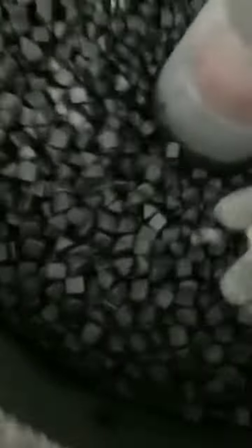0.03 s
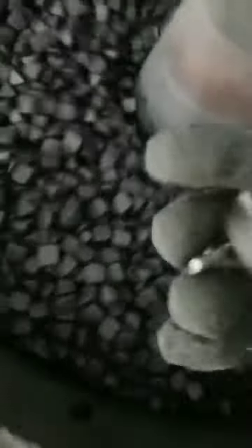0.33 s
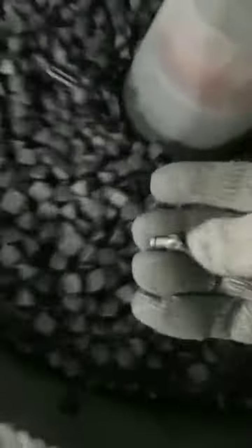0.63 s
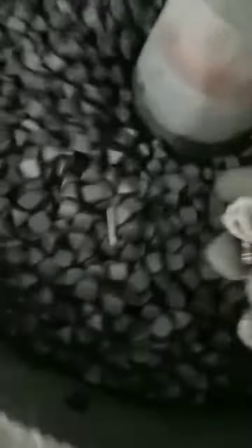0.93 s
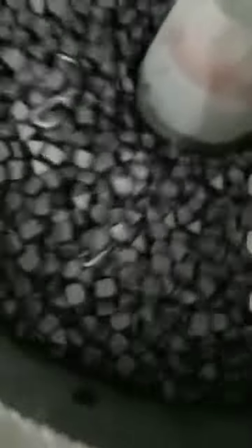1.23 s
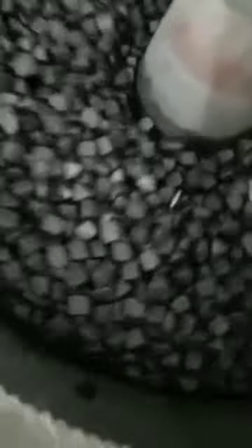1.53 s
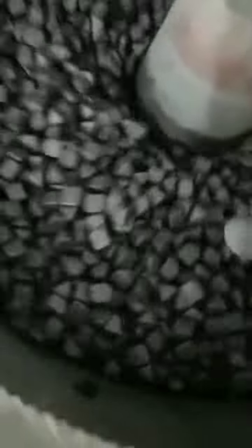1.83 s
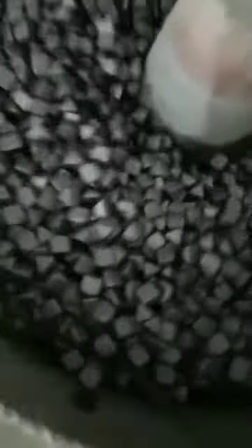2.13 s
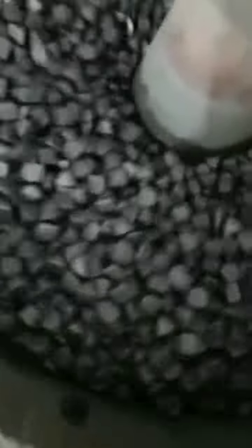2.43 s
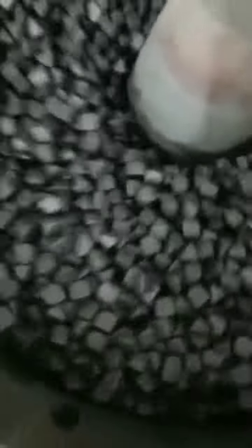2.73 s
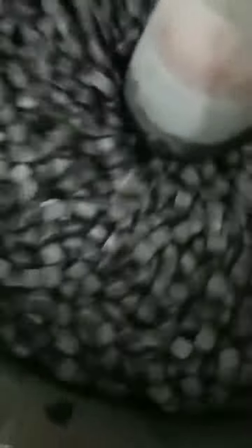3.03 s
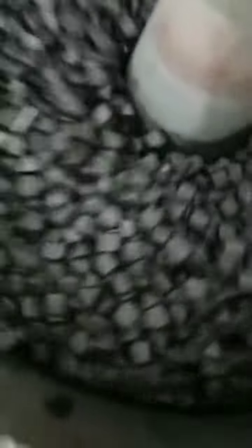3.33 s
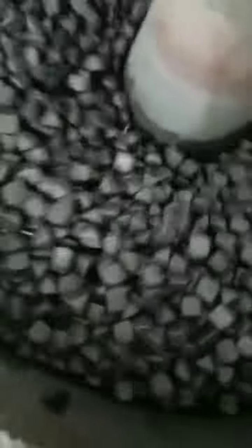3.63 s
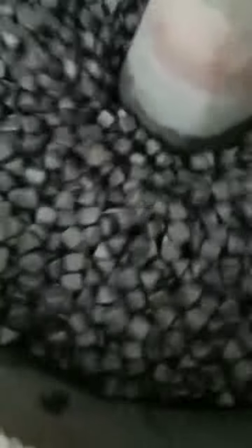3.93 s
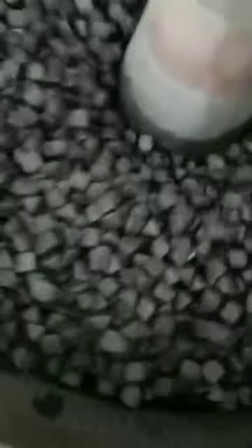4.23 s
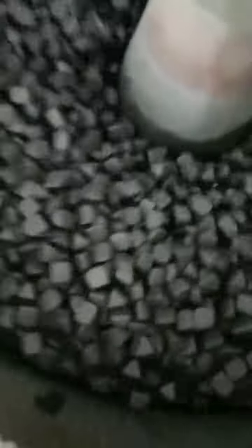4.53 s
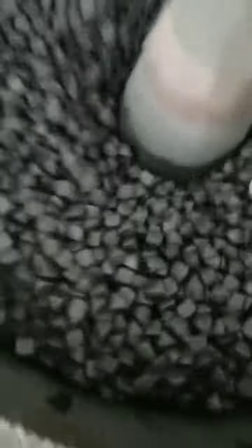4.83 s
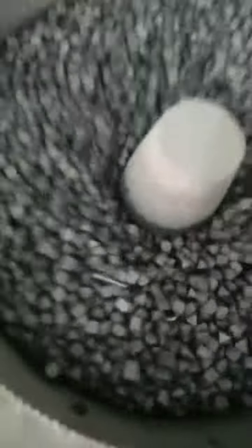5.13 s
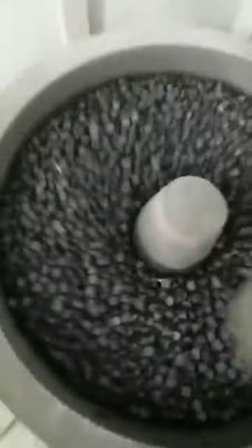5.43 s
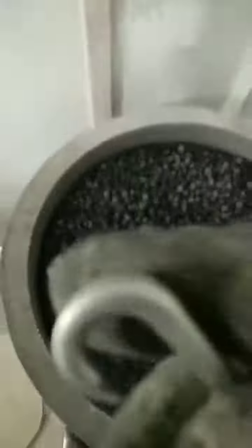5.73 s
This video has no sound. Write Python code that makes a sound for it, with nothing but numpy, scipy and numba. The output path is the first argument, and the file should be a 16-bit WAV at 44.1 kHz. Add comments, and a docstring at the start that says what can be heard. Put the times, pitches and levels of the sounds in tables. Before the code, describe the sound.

Thousands of polishing chips clatter and sizzle in a humming, shaking tumbler bowl, the rattle growing softer and duller near the end.

```python
"""Polishing chips rattle in a vibratory tumbler, shaken 24.5 times a second by an off-centre weight.
The heap is tossed and lands once a turn: chips click, clack and scrape, small metal parts clink,
and the bowl booms. The weight makes the housing hum over a low rumble from the mounts.
The microphone hangs over the bowl and draws back near the end, into the workshop's even roar."""
import sys
import numpy as np
from scipy import signal
from scipy.fft import rfft, irfft, next_fast_len
from scipy.io import wavfile
from scipy.ndimage import map_coordinates
from numba import njit

SR = 44100
rng = np.random.default_rng(int(sys.argv[2]) if len(sys.argv) > 2 else 0)


def bounce(signal):
    """Save signal as a 16-bit WAV file at the path given by the first command-line argument."""
    frames = np.transpose(np.atleast_2d(signal))
    limited = np.clip(frames, -1, 1)
    pcm = np.round(limited * 32767).astype(np.int16)
    wavfile.write(sys.argv[1], SR, pcm)


N = 264600

SHAFT_HZ, TOP_HZ = 24.523, 15150
# Resonances of the loaded bowl: f/Hz, width/Hz, gain/dB
BOWL_MODES = [(210.5, 50, 0), (254, 60, -6.5), (395, 38, -14)]
# Left-right likeness of rattle and roar: f/Hz, correlation
CORRELATION = [(250, 0.98), (600, 0.054), (1200, 0.17), (2500, 0.79), (5000, 0.16), (12000, -0.049)]


def chip_rattle(turns, back, level_db):
    """Thousands of chips click together, hardest as the heap lands; every second toss is higher."""
    # Chip-on-chip spectrum: f/Hz, level/dB
    spectrum = [(250, -30), (600, -3), (720, -14.5), (810, -10), (930, -21.5), (1380, -9.5), (1800, -8),
                (2300, -2.5), (2900, -5.5), (3600, -4.5), (4200, -7), (4900, -13), (6900, -10), (8300, -19),
                (10200, -18.5), (12500, -21), (15000, -47)]
    # Resonances colouring the rattle: f/Hz, width/Hz, lift/dB
    hollow = [(1040, 65, 6), (1390, 80, 2.5), (1505, 60, 4.5), (1850, 230, 5), (2160, 110, 3)]
    landing_turn = 0.65
    beam_hz, beam_width_hz = 4240, 470  # resonance beamed upward by the bowl
    height_db = 0.28 * np.cos(np.pi * (turns - landing_turn)) + 0.3 * wobble(35)
    toss = once_a_turn(turns, at=landing_turn, sharp=0.175) * amp(height_db)
    surface = surface_chips(toss, count=16000, base_t60_s=0.052, scatter_db=1.9, linger_s=0.065)
    buried = spread(contacts(rate_hz=18000, scatter_db=3) * toss, CORRELATION)  # dry crunch
    lift_db = lambda hz: sum(db / (1 + (2 * (hz - c) / w) ** 2) for c, w, db in hollow)
    rattle = unit(filtered(buried + amp(1.2) * surface, lambda hz: amp(along(spectrum, hz) + lift_db(hz))))
    treble = filtered(rattle, lambda hz: hz ** 2 / (hz ** 2 + 5000 ** 2))
    shaded = rattle - 0.26 * back * treble  # the rim screens the treble
    beam = filtered(rattle, lambda hz: 1 / (1 + 2j * (hz - beam_hz) / beam_width_hz))
    return amp(level_db) * (shaded + (0.42 - 0.38 * back) * beam)


def surface_chips(toss, count, base_t60_s, scatter_db, linger_s):
    """Each loose chip has its own pitch and place, and strikes four times before it sinks."""
    birth, pitch, place, damping = rng.random((4, count, 1))
    size = amp(scatter_db * np.clip(rng.standard_normal((count, 1)), -2, 2))
    size = size * rng.uniform(0.3, 1, (count, 4))
    start_s = (birth * N / SR + linger_s * rng.random((count, 4))) % (N / SR)
    hz = 900 + 10000 * pitch ** 1.3
    # small, high chips are fainter and die sooner
    size = size * toss[(start_s * SR).astype(int)] * (1 - pitch / 3)
    t60_s = base_t60_s * (0.5 + damping) / (1 + (hz / 11000) ** 2)
    columns = np.broadcast_arrays(start_s, hz, size, t60_s, 2 * place - 1)
    return unit(strikes(*[c.ravel() for c in columns]))


def chip_clacks():
    """A chip drops hard on the heap and rebounds once."""
    # Hard drops: t/s, relative level/dB, f/Hz
    drops = [(0.03, -7, 2264), (0.076, -4, 2310), (0.315, -8, 4260), (0.488, -19, 1400), (0.606, -8, 2230),
             (0.614, -8, 1950), (.817, -15, 4155), (0.8484, -7, 2300), (0.889, -7, 1798), (0.887, -8, 1980),
             (0.939, -8, 2310), (0.962, -7.5, 1754), (1.055, -13, 2756), (1.499, -13, 3682),
             (1.588, -3, 2420), (2.111, -8, 2700), (2.158, -5, 1980), (2.435, -8, 3875), (2.646, -5, 1950),
             (2.687, -12, 4200), (2.736, -5, 3434), (2.764, -3, 2670), (2.847, -4, 2350), (2.862, -6, 2610),
             (2.978, -2, 2310), (3.216, -8, 2320), (3.271, -4, 2370), (3.293, -3.5, 2330),
             (3.67, -6.5, 2530), (3.708, -7, 2605), (3.789, -8, 2680), (3.839, -6, 2530),
             (3.854, -4.5, 2110), (3.946, -9, 4190), (3.994, -7, 2390), (4.022, -8, 1730),
             (4.347, -7, 2160), (4.35, -8, 4230), (4.4817, -8, 2540), (4.5637, -6, 1948), (4.64, -11, 2150),
             (4.814, -5, 3509), (4.82, -11, 2230), (4.98, -7, 2300)]
    start_s, db, hz = np.transpose(drops)
    size, t60_s = amp(db - 9.8), 0.068
    place, flight, tilt = rng.uniform(-0.733, 1, (len(start_s), 3)).T
    first = strikes(start_s, hz, size, t60_s, bearing=0.69 * place)
    rebound_s = start_s + 0.011 * (1 + flight / 2)
    rebound = strikes(rebound_s, hz * (1 + 0.016 * tilt), size * amp(-8.5), t60_s, bearing=0.24 * place)
    return first + rebound


def chip_scrapes(turns, level_db):
    """After each landing the chips slide over one another with a fine sizzle."""
    # Scrape spectrum: f/Hz, level/dB
    spectrum = [(3500, -30), (5000, -3), (6000, 2), (7100, 1.5), (8200, -19), (9600, -13), (12000, -25),
                (15000, -36)]
    scrapes = contacts(rate_hz=4500, scatter_db=3) * once_a_turn(turns, at=0.89, sharp=0.4)
    sizzle = filtered(spread(scrapes, CORRELATION), lambda hz: amp(along(spectrum, hz)))
    return amp(level_db) * unit(sizzle)


def metal_parts():
    """A part rings on one high mode while chips strike it; the briefer the contact, the harder its tick."""
    # Clinks: t/s, contact/s, f/Hz, relative level/dB
    clinks = [(0.417, 0.059, 10303, -32.5), (.435, .035, 9743, -40), (0.809, .045, 10280, -41),
              (0.86, .048, 10290, -37), (1.6, .012, 11225, -42), (2.652, .006, 14850, -33),
              (3.003, 0.022, 7421, -31), (3.04, .022, 7360, -36), (3.19, .032, 12100, -38.5),
              (3.34, .05, 10350, -43), (3.81, 0.026, 10282, -35), (4.195, .02, 7335, -35),
              (4.955, 0.025, 7440, -34), (4.96, 0.025, 9474, -43)]
    attack_s, t60_cycles = 0.003, 270
    t = np.arange(N) / SR
    out = np.zeros((2, N))
    crack = unit(filtered(rng.standard_normal((2, N)), lambda hz: (hz > 5000) * (hz < TOP_HZ)))
    for start_s, contact_s, hz, db in clinks:
        decay_db = -60 * np.clip(t - start_s - contact_s, 0, 1) * hz / t60_cycles
        envelope = np.clip((t - start_s) / attack_s, 0, 1) * amp(decay_db)
        jolts = amp(2.5 * wobble(150)) * np.exp(0.6j * wobble(250))  # strikes upset level and phase
        tone = (jolts * np.exp(2j * np.pi * (hz * t + 0.3 * rng.random((2, 1))))).imag
        tick = amp(4) * np.exp(-contact_s / 0.011) * crack
        out += amp(db - 1.5) * envelope * (tone + tick)
    return out


def bowl(turns, back, swell_db):
    """The landing heap thumps the bowl, drums on its wall and keeps its rim ringing."""
    # Wall resonances: f/Hz, width/Hz, gain/dB
    wall_modes = [(345, 45, -11), (401.6, 50, 11)]
    # Rim resonances: f/Hz, width/Hz, gain/dB
    rim_modes = [(495.7, 21, 19), (604, 160, -29)]
    # Drumming on the wall: t/s, relative level/dB
    wall_levels = [(0.05, -34), (0.47, -27.5), (0.65, -34), (1.65, -41), (2.2, -32), (2.55, -39),
                   (2.85, -30), (3.1, -23), (3.35, -37.5), (3.6, -27), (4.0, -34), (4.45, -30), (5.0, -39),
                   (5.3, -53), (5.95, -37)]
    thumps = contacts(rate_hz=2200, scatter_db=4.5) * once_a_turn(turns, at=0.81, sharp=0.12)
    drumming = contacts(rate_hz=3400, scatter_db=2) * once_a_turn(turns, at=0.55, sharp=0.11)
    boom_band = lambda hz: 1 / (1 + (150 / (hz + 1)) ** 6) / (1 + (hz / 480) ** 6)
    boom = unit(filtered(ring(thumps, BOWL_MODES), boom_band))
    wall = unit(filtered(ring(drumming, wall_modes), lambda hz: 1 / (1 + (hz / 520) ** 6)))
    rim = ring(drumming, rim_modes)
    return (amp(-30 - 9.5 * back + swell_db) * spread(boom, [(180, 1), (280, 0.66), (450, 0.67)])
            + amp(curve(wall_levels) - 4.5) * spread(wall, [(400, 0.49)])
            + amp(-34.5 - 16 * back) * spread(rim, [(500, 0.77)]))


def boom_swells():
    """Short rounded throbs of the bowl's boom, in dB."""
    # Crests: t/s, 1/e half-width/s, lift/dB
    crests = [(0.3, 0.034, 4.5), (0.581, 0.044, 4), (0.7, 0.023, 8.5), (0.87, 0.039, 5.5),
              (1.72, 0.026, 10.5), (2.04, 0.076, 9), (2.2, 0.063, 13), (2.53, 0.037, 7), (3.0, 0.028, 5),
              (3.548, 0.035, 9), (3.929, 0.021, 9), (4.08, 0.025, 7.5), (4.25, 0.041, 11),
              (5.7, 0.057, 5.5)]
    t = np.arange(N) / SR
    return sum(db * np.exp(-((t - crest_s) / width_s) ** 2) for crest_s, width_s, db in crests)


def housing(turns, back, swell_db):
    """The weight sways the bowl; its knock makes the housing hum on whole and half shaft multiples."""
    # Hum: shaft multiple, near level/dB, far level/dB
    hum = [(1.5, -44, -58), (2, -43, -59), (2.5, -53, -68), (3, -56, -46), (6, -51, -56), (7, -42, -47),
           (7.5, -46, -52), (8, -30.5, -37), (8.5, -33.5, -39), (9, -36, -40), (9.5, -39.5, -43),
           (11, -37.5, -39.5), (11.5, -39, -43), (12, -39, -39), (13, -48, -52), (14, -39.5, -46),
           (15, -43, -58), (16, -36.5, -46), (17, -52, -48), (24, -55, -63)]
    # Tones out of step with the shaft: f/Hz, near level/dB, far level/dB
    drones = [(53.2, -45, -56), (91.8, -39.5, -40), (157.6, -31, -36)]
    knock_turn = 0.74
    bowl_hz, bowl_width_hz, _ = BOWL_MODES[0]
    sway_db = -23.5 - 25.5 * back + 0.41 * wobble(12)
    out = amp(sway_db) * np.cos(2 * np.pi * turns) * np.ones((2, 1))
    # the heap keeps losing its every-second-turn step, so the half multiples slip together
    slip = 1.4 * wobble(1.2)
    tones = [(k * SHAFT_HZ, near_db, far_db, slip * (k % 1 > 0)) for k, near_db, far_db in hum]
    tones += [(*row, 0) for row in drones]
    for hz, near_db, far_db, drift in tones:
        lag = np.arctan(2 * (hz - bowl_hz) / bowl_width_hz)
        phase = 2 * np.pi * hz * (turns - knock_turn) / SHAFT_HZ - lag + drift
        phase += 0.8 * rng.standard_normal() + 0.26 * wobble(9)  # wavers with the shifting load
        stereo_skew = np.clip(0.15 * (hz / 280) ** 2, 0, 0.7) * np.array([[1], [-1]])
        throb_db = 0.72 * swell_db / (1 + ((hz - bowl_hz) / 14) ** 2)  # near the bowl's resonance
        level_db = near_db + back * (far_db - near_db) + throb_db - 1.45 + 1.46 * wobble(9)
        out += amp(level_db) * np.cos(phase + stereo_skew)
    return np.sqrt(2) * out


def low_rumble(back):
    """Dull rumble of the shaking base; a soft low thud, perhaps microphone handling, near 1.4 s."""
    # Rumble spectrum: f/Hz, level/dB
    spectrum = [(10, -20), (35, -7), (70, 1), (120, -3.5), (200, -3), (400, -9), (900, -36), (4000, -50)]
    thud_db = 4.5 * np.exp(-((np.arange(N) / SR - 1.41) / 0.078) ** 2)
    rumble = filtered(rng.standard_normal((2, N)), lambda hz: amp(along(spectrum, hz)))
    level_db = -33.5 - 7.4 * back + thud_db + 2.2 * wobble(7.1)
    return amp(level_db) * spread(rumble, [(130, 0.87), (500, 1)])


def room_roar(back):
    """The machine's even roar, returned by the room, grows away from the bowl."""
    # Roar spectrum: f/Hz, level/dB
    spectrum = [(200, -10), (420, -26), (560, -11), (690, 6), (820, 0), (960, -19), (1300, 4.5),
                (1700, -16), (2000, -4.5), (2600, 4.5), (3300, 2), (4200, -6), (9000, -38)]
    roar = filtered(rng.standard_normal((2, N)), lambda hz: amp(along(spectrum, hz)))
    return amp(-42.5 + 11.8 * back) * spread(roar, CORRELATION)


def workshop_reverb(x):
    """Diffuse tail; the treble dies first."""
    # Room decay: f/Hz, t60/s
    decay = [(200, 0.86), (2000, 0.22), (12000, 0.16)]
    hz, t, noise = signal.stft(rng.standard_normal((2, SR // 2)), SR, nperseg=256)
    tail = signal.istft(noise * amp(-60 * t / along(decay, hz)[:, None]), SR, nperseg=256)[1]
    return signal.fftconvolve(x, tail / np.linalg.norm(tail[0]), axes=1)[:, :N]


def strikes(start_s, hz, size, t60_s, bearing):
    """Short rings, each earlier and a little louder in the nearer channel."""
    pole = np.exp((2j * np.pi * hz - np.log(1000) / t60_s) / SR)
    pan = np.exp(np.outer(bearing * (0.2 + 1j * np.pi * hz * 0.0004), [1, -1]))
    return damped_rings((start_s * SR).astype(np.int64), pole, size[:, None] * pan, N)


@njit
def damped_rings(start, pole, gain, length):
    """Sum of decaying sines, each with a complex pole and left and right gains."""
    out = np.zeros((2, length))
    for i in range(len(start)):
        z = 1 + 0j
        end = min(length, start[i] + int(-5 / np.log(abs(pole[i]))))
        for n in range(start[i], end):
            out[0, n] += (gain[i, 0] * z).imag
            out[1, n] += (gain[i, 1] * z).imag
            z *= pole[i]
    return out


def contacts(rate_hz, scatter_db):
    """Random impacts of uneven size in two channels."""
    hit = rng.random((2, N)) < rate_hz / SR
    size = amp(scatter_db * np.clip(rng.standard_normal((2, N)), -2, 2))
    return unit(hit * size * rng.choice([-1, 1], (2, N)))


def once_a_turn(turns, at, sharp):
    """Swell peaking at one fraction of each turn."""
    return unit(np.exp(sharp * np.cos(2 * np.pi * (turns - at))))


def ring(x, modes):
    """x through resonances (f/Hz, width/Hz, gain/dB), at rms 1."""
    response = lambda f: sum(amp(db) * 1j * f * w / (c * c - f * f + 1j * f * w) for c, w, db in modes)
    return unit(filtered(x, response))


def spread(pair, correlation):
    """Two unrelated signals to stereo, given (f/Hz, correlation) points."""
    angle = lambda hz: np.arccos(np.clip(along(correlation, hz), -1, 1)) / 2
    mid, side = filtered(pair, lambda hz: np.array([np.cos(angle(hz)), np.sin(angle(hz))]))
    return unit(np.array([mid + side, mid - side]))


def filtered(x, response):
    """x through a complex frequency response."""
    size = next_fast_len(N + SR // 2)
    return irfft(rfft(x, size) * response(np.fft.rfftfreq(size, 1 / SR)), size)[..., :N]


def wobble(rate_hz):
    """Smooth random curve with knots at rate_hz."""
    knots = rng.standard_normal(int(N * rate_hz / SR) + 4)
    return map_coordinates(knots, [np.arange(N) * rate_hz / SR])


def along(points, hz):
    """Read (f/Hz, value) points on a log axis."""
    f, values = np.transpose(points)
    return np.interp(np.log(hz + 1), np.log(f + 1), values)


def curve(points):
    """Read (t/s, value) points at every sample."""
    return np.interp(np.arange(N) / SR, *np.transpose(points))


def amp(db):
    """dB to gain."""
    return 10 ** (np.asarray(db) / 20)


def unit(x):
    """Scale to rms 1."""
    return x / np.sqrt(np.mean(x ** 2) + 1e-20)


def scene():
    """One shaft drives rattle, thumps and hum; the machine recedes as the microphone draws back."""
    # Microphone path: t/s, position (0 over the bowl, 1 a step back)
    retreat = [(4.35, 0.22), (5.0, 0.64), (5.5, 0.8)]
    back = curve(retreat)
    turns = SHAFT_HZ * np.arange(N) / SR - 0.43
    swell_db = boom_swells()
    machine = housing(turns, back, swell_db) + bowl(turns, back, swell_db) + low_rumble(back)
    rattle_db = -20.5 - 11.5 * back ** 3.2  # fades slowly until the rim hides the heap
    scrape_db = rattle_db - 13.5 - 4.4 * back
    load = chip_rattle(turns, back, rattle_db) + chip_scrapes(turns, scrape_db)
    load += chip_clacks() + metal_parts()
    load += amp(-13 + 6 * back) * workshop_reverb(load)
    return machine * amp([[0.2], [-0.2]]) + load * amp([[0.5], [-0.5]]) + room_roar(back)


def record(dry):
    """Brick-wall low-pass at TOP_HZ."""
    return filtered(dry, lambda hz: hz < TOP_HZ)


dry = scene()
out = record(dry)
bounce(out)
```